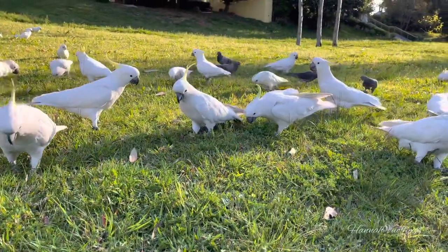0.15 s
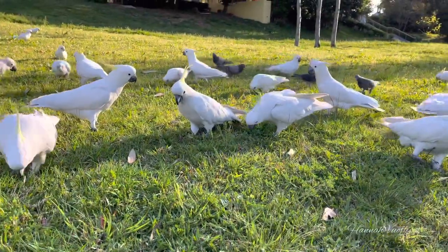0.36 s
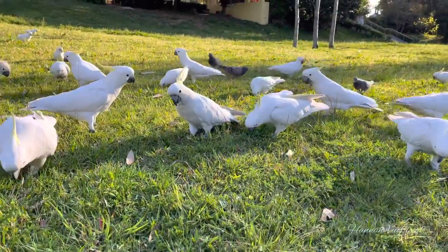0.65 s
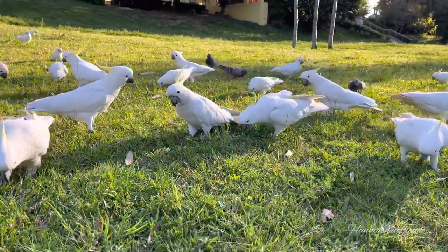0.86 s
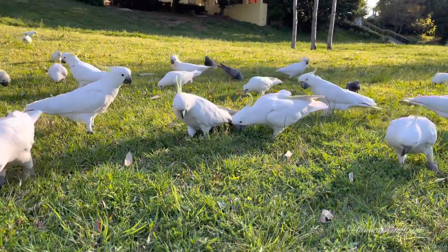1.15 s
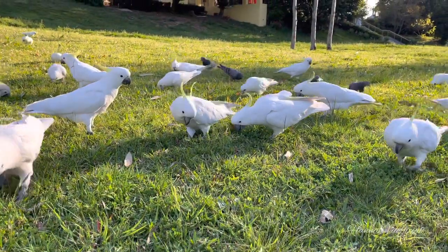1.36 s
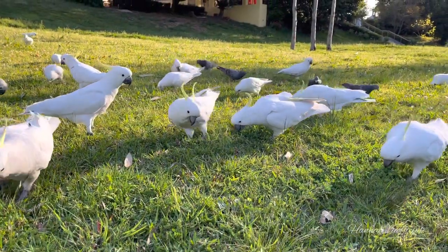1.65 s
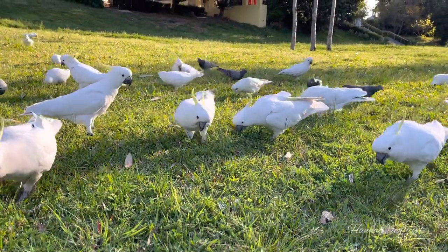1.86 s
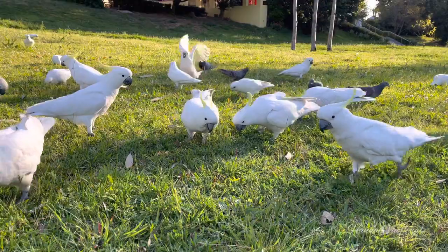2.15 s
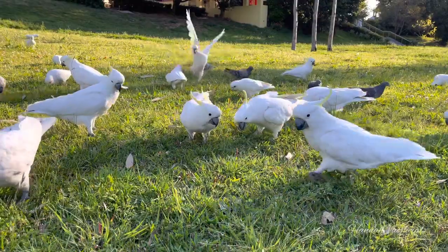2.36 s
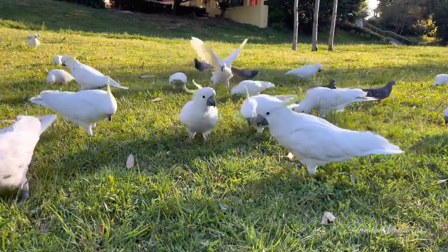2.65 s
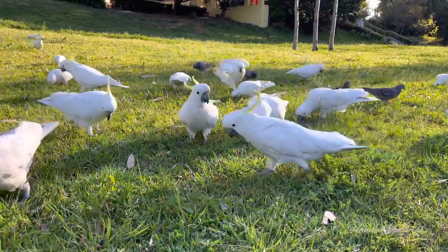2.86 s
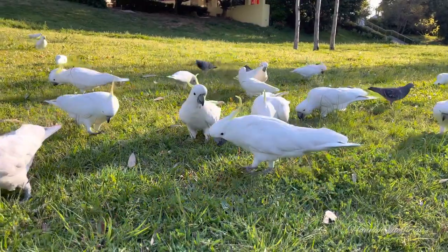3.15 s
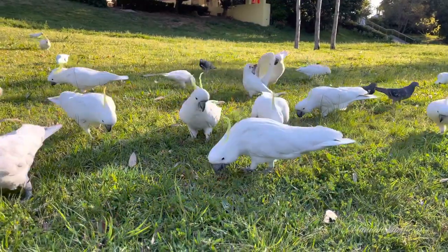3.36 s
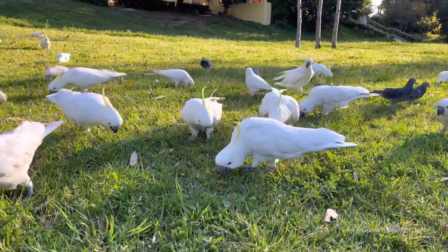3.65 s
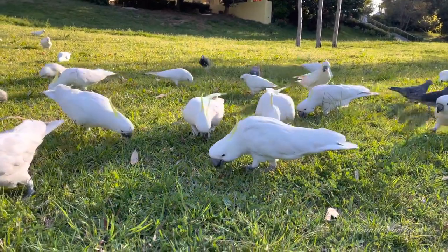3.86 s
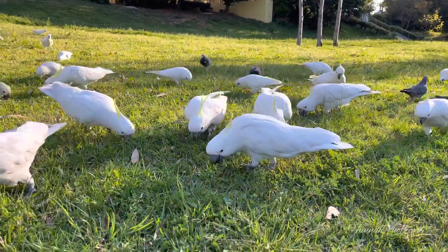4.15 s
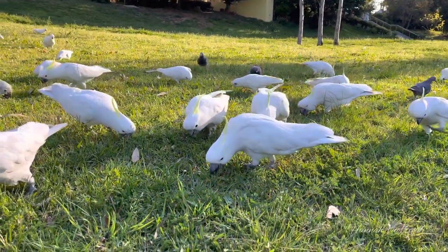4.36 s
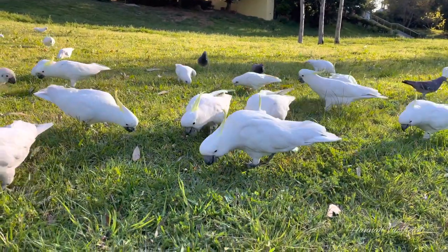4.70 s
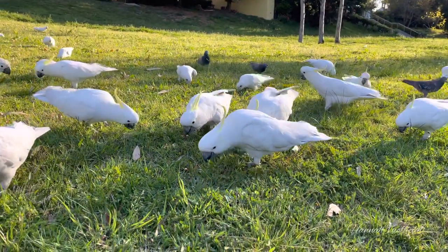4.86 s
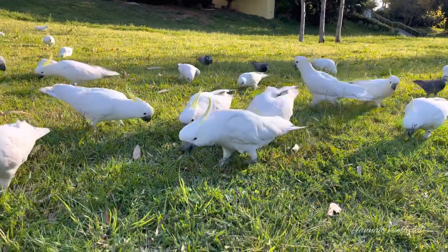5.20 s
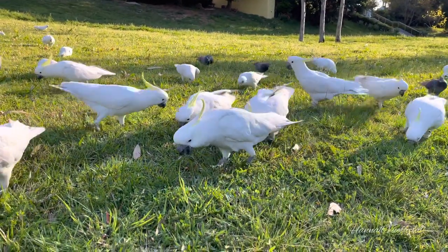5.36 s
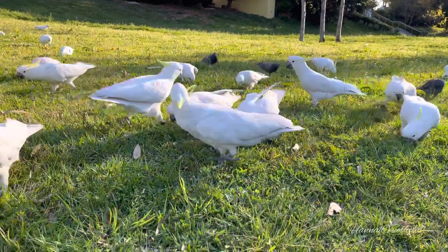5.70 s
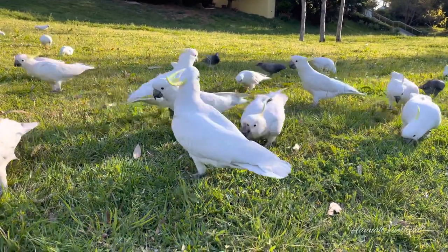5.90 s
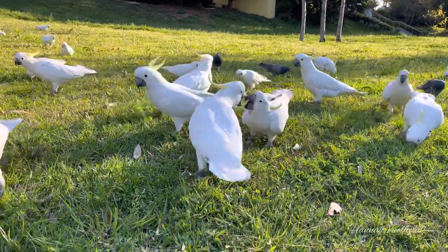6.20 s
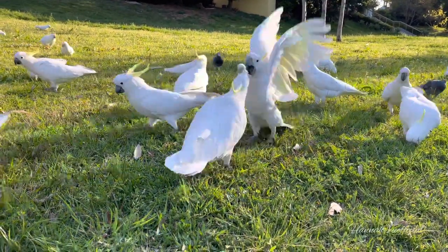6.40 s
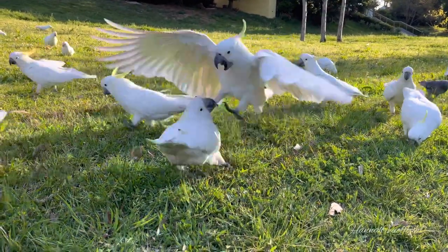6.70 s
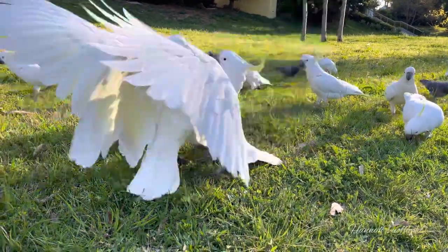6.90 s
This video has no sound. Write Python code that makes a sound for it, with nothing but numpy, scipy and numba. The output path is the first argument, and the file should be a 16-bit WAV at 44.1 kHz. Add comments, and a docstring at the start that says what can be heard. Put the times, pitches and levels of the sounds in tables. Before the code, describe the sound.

An open lawn with feeding cockatoos, heard close in stereo. The first second is nearly silent: faint quavering chatter, a small chirp, soft dull bumps and a light crack at 0.5. From about 1.1 low wind and a faint hum rise; a sharp, brittle seed crack snaps at 1.85. Faint slurred whistles sound far off at 2.3-2.7. At 3.2 a loud, harsh, raspy screech lasts about 0.2 seconds, growing duller. From 3.6 short falling chirps thicken, sliding quickly from high to lower pitch, with beak snaps, nibbles and dry rattles before some after 5.0. A brief, low gravelly squawk comes at 5.65, then clearer far whistles from 5.8. Thin two-note peeps repeat from 6.0. A bright crack clicks at 6.5 while feather and grass rustle swells from 6.4; a very short shrill squawk bursts at 6.85 as wind strengthens. Faint echo returns from trees.

```python
"""Cockatoos feed on a lawn. Faint chatter, chirps and seed cracks open; wind and hum rise after 1 s, far
whistles from 2.3 s. Close screeches at 3.2, 5.7 and 6.8 s: syrinx pulses and air ring a moving throat.
Falling chirps, some after rattles, thicken between; two-note peeps from 6 s; rustling swells from 6.4 s
as two birds squabble. Chirps and whistles are swept sines; cracks, wind and rustle are shaped noise.
Thumps are decaying sines; decaying noise makes the lawn reflections and the faint echo of the trees."""
import sys
import numpy as np
from scipy import signal
from scipy.fft import rfft, irfft
from scipy.io import wavfile
from scipy.ndimage import uniform_filter1d
from numba import njit

SR = 44100
rng = np.random.default_rng(int(sys.argv[2]) if len(sys.argv) > 2 else 0)


def materialize(psi):
    """Save the field psi as 16-bit PCM at rate SR to the path in sys.argv[1].

    A 1-D psi becomes a single channel; in a 2-D psi each row is a channel.
    """
    bounded = np.clip(np.atleast_2d(psi).T, -1, 1)
    quanta = np.round(bounded * 32767).astype(np.int16)
    wavfile.write(sys.argv[1], SR, quanta)


N = 310464
T = np.arange(N) / SR

# Screech effort: time_s, syrinx_pulse_hz, level_db
SCREECH_1 = [(3.204, 349.8, -43.5), (3.216, 349.7, -23.5), (3.234, 326.8, -18), (3.243, 137.2, -9),
             (3.288, 140.1, -13), (3.34, 162, -7), (3.397, 174.5, -15.5), (3.416, 162, -38)]
SCREECH_2 = [(5.65, 100.6, -39.5), (5.664, 96, -18.5), (5.695, 139.3, -11), (5.736, 151.8, -24),
             (5.763, 288, -31), (5.777, 272, -40)]
SCREECH_3 = [(6.834, 398.5, -38.5), (6.848, 379.3, -17), (6.869, 310.6, -14.5), (6.896, 339, -29.5)]
# Throat and beak resonances, before the beak moves: centre_hz, width_hz, relative_db
THROAT_1 = [(390, 340, -24.5), (770, 150, -21.5), (2133, 480, -1.5), (2900, 480, -9), (3720, 680, -9),
            (5360, 1100, -17), (6300, 850, -21.5), (8100, 940, -20), (11290, 1100, -25.5)]
THROAT_2 = [(348, 183, -5), (820, 260, -2.5), (1560, 760, 2), (1950, 310, 2.5), (3110, 420, -3),
            (4500, 590, -11.5), (6000, 1040, -18.5), (8000, 3400, -20)]
THROAT_3 = [(445, 410, -10), (1330, 420, 0), (1690, 840, -1), (2830, 560, -2.5), (4480, 1100, -8.5),
            (5370, 520, -9.5), (8900, 2200, -17)]
# Beaks crack seed and snap grass: start_s, snap_peak_db, knock_re_snap_db, upper_edge_hz
SEED_CRACKS = [(.502, -38.5, -5, 9000), (1.408, -40.5, -23, 6950), (1.8535, -11.5, -13.5, 9250),
               (3.696, -32, -24.5, 11990), (4.522, -38.5, 2.5, 8000), (4.66, -43, 4.5, 9030),
               (4.727, -33, -30, 13000), (4.772, -25, -36, 13000), (4.989, -38, -30, 12000),
               (5.276, -24, -30, 12770), (5.568, -38, -21, 12000), (6.177, -33.5, -7, 11900),
               (6.507, -20.5, -25, 13000)]
# Husk resonances: centre_hz, width_hz, relative_db
HUSK_MODES = [(2930, 1550, -19), (4710, 1100, -14), (5850, 1300, -9), (7260, 850, -7.5), (8480, 1800, -9),
              (11500, 1060, -2.5)]
# Falling chirps: start_s, length_s, top_hz, end_hz, level_db (before swell and sag), overtone_db
FALLING_CHIRPS = [(0.35, 0.056, 4420, 2280, -45.5, -20), (1.34, 0.055, 3850, 2510, -45, -20),
                  (3.611, 0.039, 4100, 2240, -33, -14), (3.854, 0.032, 4450, 2610, -36, -20),
                  (4.077, 0.12, 3320, 2260, -51.5, -28), (4.28, 0.14, 4830, 2284, -39.5, -11.5),
                  (4.397, 0.085, 2870, 2095, -47.5, -23), (4.64, 0.1, 3360, 2080, -45, -24),
                  (4.775, 0.11, 4270, 2030, -34, -2), (4.948, 0.086, 3020, 2100, -45.5, -22.5),
                  (5.077, 0.138, 4375, 2194, -31.5, -11), (5.362, 0.13, 4390, 2114, -30, -14),
                  (5.683, 0.122, 3747, 2105, -34.5, -16)]
# Two-note peeps of one bird: start_s, level_db (before swell and sag)
TWO_NOTE_PEEPS = [(6.025, -41), (6.24, -43), (6.464, -40), (6.694, -39), (6.917, -36)]
# Quavering chatter: start_s, length_s, start_pitch_hz, end_pitch_hz, beak_hz, level_db (before fades)
CHATTER_NOTES = [(0.33, 0.073, 1390, 1300, 4000, -50.5), (0.68, 0.069, 1300, 1196, 2800, -59),
                 (0.978, .04, 2400, 2870, 5300, -65), (1.29, 0.13, 1400, 1310, 3800, -65),
                 (1.782, .19, 2130, 2680, 2200, -52), (3.546, 0.087, 1346, 1346, 4244, -46),
                 (3.809, 0.081, 2050, 1950, 2900, -56), (6.44, .06, 3170, 3070, 3100, -43)]
# Dry rattles ahead of chirps: start_s, length_s, level_db (before fades)
DRY_RATTLES = [(5.004, 0.067, -49), (5.283, 0.067, -44.5), (5.594, 0.071, -48.5)]
# Throat resonances of a rattle: centre_hz, width_hz, relative_db
RATTLE_MODES = [(2700, 460, 1), (3580, 490, -3), (4800, 1400, -12), (5950, 990, -18)]
# Port balance of the small birds, shaded by the microphone body: pitch_hz, left_minus_right_db
PORT_SHADE = [(1000, 2), (2150, -4), (2800, 2.5), (3700, 5.5), (6000, 9.5), (12000, 3)]
# Far slurred whistles: start_s, length_s, lowest_pitch_time_s, lowest_to_highest_s,
# low_hz, high_hz, level_db, left_lead_samples
FAR_WHISTLES = [(2.308, 0.095, 2.5, .12, 1547, 1683, -53.5, -9),
                (2.493, 0.19, 2.65, .12, 1493, 1658, -46.5, -9.5),
                (5.775, .19, 5.797, 0.098, 1264, 1842, -27.5, 10),
                (5.937, 0.26, 5.945, 0.12, 1378, 1780, -37, 10),
                (6.414, 0.1, 6.51, .14, 1207, 1478, -32.5, 6),
                (6.529, 0.17, 6.75, 0.1, 1233, 1785, -27.5, 10),
                (6.69, 0.18, 6.69, 0.11, 1337, 1715, -34.5, 10.5)]
# Soft low thumps: start_s, peak_db, pitch_hz
LOW_THUMPS = [(.345, -46.5, 285), (.415, -48, 254), (2.272, -32, 87), (3.945, -27.5, 100)]
# Steps and wingbeats: peak_s, rise_s, decay_s, level_db
MOVEMENTS = [(.07, .12, .08, -55.5), (2.08, 0.023, 0.14, -53.5), (2.43, 0.098, 0.55, -54),
             (2.8, 0.14, 0.25, -51), (4.45, 0.036, .2, -55), (4.76, .06, 0.36, -56.5),
             (5.4, 0.44, 1, -54.5), (6.44, .06, 0.5, -45), (6.82, 0.16, 3.8, -38)]
# Grass and feather spectrum: freq_hz, relative_db_per_hz
RUSTLE_SPECTRUM = [(110, -38), (250, -0.5), (1500, -9), (3000, -6.5), (5500, -10.5), (7300, -9),
                   (8700, -1.5), (10000, -8), (11300, 2.5), (12000, -9), (12900, -21)]
# Wind strength before a fixed trim: time_s, level_db
WIND_LEVEL = [(0, -104), (1.1, -73), (1.32, -53.5), (1.55, -44.5), (3.1, -42), (3.85, -39.5), (4.2, -41),
              (6.3, -41), (6.8, -35)]
# Wind spectrum: freq_hz, relative_db_per_hz
WIND_SPECTRUM = [(20, -27.5), (35, -18), (55, 0.5), (100, -5), (150, -10), (220, -15), (330, -24.5),
                 (500, -33.5), (1000, -55)]
# Low hum: time_s, level_db
HUM_LEVEL = [(1.05, -85), (1.5, -48.5), (2.6, -52.5), (2.85, -43), (4.0, -43), (5.4, -52.5)]
# Far wash spectrum: freq_hz, relative_db_per_hz
AIR_SPECTRUM = [(110, -30), (190, -5), (270, 1), (550, -10.5), (900, -5), (1500, -10.5), (2400, -13.5),
                (3500, -20), (8000, -17), (12000, -22.5)]

# Slide time constant: a fixed time plus a share of the call's length
CHIRP_FALL_S, CHIRP_FALL_SHARE = 0.00516, 0.065
CHIRP_SWELL_DB = 17  # low note over top note
PEEP_S, PEEP_FALL_S, PEEP_TOP_HZ, PEEP_END_HZ, PEEP_SWELL_DB = 0.096, 0.00497, 3658, 2024, 7.5
WHISTLE_ATTACK_S, WHISTLE_RELEASE_SHARE = 0.02, 0.44  # release as a share of the note
NIBBLE_FROM_S, NIBBLE_TO_S, NIBBLE_MIN_DB, NIBBLE_RANGE_DB = 4.4, 6.8, -46, 4
RUSTLE_REST_DB = -62.5  # the flock standing and feeding
HUM_HZ, AIR_DB, WIND_TRIM_DB = 117.8, -57.5, -1.53
ECHO_T60_S, ECHO_DAMP_HZ = 1.0, 3220
TOP_HZ = 12915


def undb(db):
    """Decibels to gain."""
    return 10 ** (np.asarray(db) / 20)


def unit(x):
    """Scale to rms 1."""
    return x / np.sqrt(np.mean(x ** 2) + 1e-18)


def curves(rows, t):
    """Table columns interpolated at times t."""
    time_s, *columns = np.transpose(rows)
    return [np.interp(t, time_s, column) for column in columns]


def span(rows):
    """Sample times from a table's first row to its last."""
    return T[int(rows[0][0] * SR):int(rows[-1][0] * SR)]


def times(length_s):
    """Sample times of a note, from 0."""
    return np.arange(int(length_s * SR)) / SR


def swell(t, attack_s, release_s):
    """Soft attack, hold and soft release over times t."""
    ramp = np.minimum((t - t[0]) / attack_s, (t[-1] - t) / release_s)
    return np.sin(np.pi / 2 * np.clip(ramp, 0, 1)) ** 2


def fade(t, edge_s):
    """Equal soft start and end over times t."""
    return swell(t, edge_s, edge_s)


def noise(t):
    """White noise for times t."""
    return rng.standard_normal(N)[:len(t)]


def walk(t, rate_hz):
    """Random wander of spread near 1: straight lines between rate_hz random points a second."""
    return 1.2 * np.interp((t - t[0]) * rate_hz, np.arange(4096), rng.standard_normal(4096))


def colour(x, points):
    """Filter x by (freq_hz, db) points, then scale to rms 1."""
    hz, db = np.transpose(points)
    log_f = np.log(np.arange(N // 2 + 1) * SR / N + 1)
    return unit(irfft(rfft(x) * undb(np.interp(log_f, np.log(hz), db)), N))


@njit
def band(x, hz, width_hz):
    """State-variable band-pass with a moving centre."""
    y, band_state, low_state = np.empty(len(x)), 0., 0.
    for i in range(len(x)):
        g, k = np.tan(np.pi * hz[i] / SR), width_hz / hz[i]
        v = (band_state + g * (x[i] - low_state)) / (1 + g * (g + k))
        band_state, low_state = 2 * v - band_state, low_state + 2 * g * v
        y[i] = k * v
    return y


def resonate(x, modes, tuning=1):
    """Sum of steep (centre_hz, width_hz, db) resonances, each two band-passes, retuned together."""
    out = 0
    for hz, width_hz, db in modes:
        centre_hz = np.minimum(hz * tuning * np.ones(len(x)), SR / 2.2)
        once = band(x, centre_hz, float(width_hz))
        out = out + undb(db) * band(once, centre_hz, float(width_hz))
    return out


def add(out, x, start_s, pan_db=0, lag=0):
    """Mix x in; it reaches the left port lag samples before the right; positive pan_db is left."""
    for channel, side in enumerate((1, -1)):
        i = max(int(start_s * SR) + channel * lag, 0)
        part = x[:max(N - i, 0)]
        out[channel, i:i + len(part)] += part * undb(side * pan_db / 2)


def spread(make, side_db):
    """Two draws of a sound as middle and side."""
    return make() + undb(side_db) * make() * np.array([[1], [-1]])


def syrinx(t, hz, rasp, jitter, scatter_db, open_share):
    """Membranes slap shut at uneven intervals; air rushes through after each slap. Returns both."""
    turns = np.cumsum(hz * (1 + jitter * walk(t, 200))) / SR
    slaps = np.diff(np.floor(turns), prepend=0) * np.sqrt(SR / hz) * undb(scatter_db * walk(t, 300))
    air = unit(noise(t) * (0.6 + np.exp(-(turns % 1) / open_share)))
    rasp = np.clip(rasp, 0, 1)
    return np.sqrt(1 - rasp) * slaps, np.sqrt(rasp) * air


def screech(rows, throat, jitter, scatter_db, rasp_hz, rasp_db, rasp_share,
            gape_per_db, sink_per_s, dull_db_per_s, body_db):
    """The syrinx rings a throat that effort tunes higher; the call grows raspier and duller."""
    t = span(rows)
    hz, db = curves(rows, t)
    effort_db, late_s = db - db.max(), t - t.mean()
    rasp = np.clip(rasp_share + 1.8 * late_s - 0.008 * effort_db, 0.05, 1)  # weak push: mostly air
    tuning = 1 + gape_per_db * effort_db - sink_per_s * (t - t[np.argmax(db)])
    slaps, air = syrinx(t, hz, rasp, jitter * rasp, scatter_db, open_share=0.48)
    shrill = resonate(air, [(rasp_hz, 500, rasp_db)])
    voice = resonate(slaps + air + shrill, throat, tuning * (1 + 0.017 * walk(t, 150)))

    low = signal.sosfiltfilt(signal.butter(3, 3200, fs=SR, output="sos"), voice)
    voice = low + (voice - low) * undb(-dull_db_per_s * late_s)
    # levelled, so that effort alone sets the loudness
    steady = voice / np.sqrt(uniform_filter1d(voice ** 2, size=SR // 45) + 1e-9)
    # the low body changes little with effort
    body = unit(resonate(slaps + air, [(560, 930, 0)], tuning)) * undb(body_db + 0.22 * effort_db)
    return (steady * undb(db) + body) * fade(t, 0.005)


def screeches():
    """Three close calls: the first grows duller as its beak closes, tuning near still; the others sink."""
    out = np.zeros((2, N))
    first = screech(SCREECH_1, THROAT_1, jitter=0.13, scatter_db=0.3, rasp_hz=2665, rasp_db=5.5,
                    rasp_share=0.33, gape_per_db=0.001, sink_per_s=-0.1, dull_db_per_s=40, body_db=-42)
    second = screech(SCREECH_2, THROAT_2, jitter=0.35, scatter_db=2.0, rasp_hz=1500, rasp_db=-14,
                     rasp_share=0.37, gape_per_db=0.01, sink_per_s=1.7, dull_db_per_s=20, body_db=-49)
    third = screech(SCREECH_3, THROAT_3, jitter=0.2, scatter_db=3.0, rasp_hz=2900, rasp_db=3.5,
                    rasp_share=0.55, gape_per_db=0.02, sink_per_s=1.5, dull_db_per_s=62, body_db=-42)
    add(out, first, SCREECH_1[0][0], pan_db=-1.8)
    add(out, second, SCREECH_2[0][0], pan_db=1.0, lag=2)
    add(out, third, SCREECH_3[0][0], pan_db=1.5, lag=2)
    return out


def crack(db, knock_db, edge_hz, burst_s=0.0012, tail_s=0.0062, knock_hz=750):
    """A brittle noise burst rings the husk; the beak gives a low knock."""
    t = T[:SR // 30]
    burst = noise(t) * (np.exp(-t / burst_s) + 0.052 * np.exp(-t / tail_s))
    snap = resonate(burst, HUSK_MODES)
    snap = signal.sosfilt(signal.butter(10, min(edge_hz, SR / 2.2), fs=SR, output="sos"), snap)
    knock = np.sin(2 * np.pi * knock_hz * t) * np.exp(-t / 0.0016)
    return undb(db) * (snap / np.abs(snap).max() + undb(knock_db) * knock)


def cracks(nibble_count=5):
    """Single cracks and a few faint nibbles at random times, left of centre."""
    out = np.zeros((2, N))
    for start_s, db, knock_db, edge_hz in SEED_CRACKS:
        add(out, crack(db, knock_db, edge_hz), start_s, pan_db=4.5)
    for when, size in rng.random((nibble_count, 2)):
        nibble = crack(NIBBLE_MIN_DB + NIBBLE_RANGE_DB * size, knock_db=-26, edge_hz=13000)
        add(out, nibble, NIBBLE_FROM_S + when * (NIBBLE_TO_S - NIBBLE_FROM_S), pan_db=2.5)
    return out


def chirp(length_s, fall_s, top_hz, end_hz, db, swell_db, overtone_db):
    """A begging bird slides from a high note to a low one; overtones flare during the slide."""
    t = times(length_s)
    middle_s = 0.46 * length_s
    slide = 0.5 + 0.5 * np.tanh((t - middle_s) / fall_s / 2)
    scoop = 1 - 230 * np.maximum(middle_s - t - 0.04, 0) ** 2  # long calls first swoop up
    hz = (top_hz + (end_hz - top_hz) * slide) * scoop * (1 + 0.0052 * walk(t, 255))
    phase = 2 * np.pi * np.cumsum(hz) / SR

    flare = 4 * slide * (1 - slide)  # 1 at mid-slide
    overtones = flare ** 2 * np.sin(2 * phase) + undb(-14) * flare * np.sin(3 * phase)
    tone = np.sin(phase) + undb(overtone_db) * overtones
    level_db = db - swell_db * (1 - slide) + 1.5 * walk(t, 120)
    voiced = 1 / (1 + flare * (0.007 / fall_s) ** 4)  # the voice breaks in a very quick leap
    sag = 1.7 * (1 - 0.88 * np.exp((t - t[-1]) / 0.042))  # eases off towards the end
    return np.sqrt(2) * tone * undb(level_db) * voiced * sag * fade(t, 0.0083)


def chirps():
    """Sliding chirps, slower the longer they are, plus a late run of two-note peeps."""
    out = np.zeros((2, N))
    for start_s, length_s, top_hz, end_hz, db, overtone_db in FALLING_CHIRPS:
        fall_s = CHIRP_FALL_S + CHIRP_FALL_SHARE * length_s
        add(out, chirp(length_s, fall_s, top_hz, end_hz, db, CHIRP_SWELL_DB, overtone_db), start_s)
    for start_s, db in TWO_NOTE_PEEPS:
        peep = chirp(PEEP_S, PEEP_FALL_S, PEEP_TOP_HZ, PEEP_END_HZ, db, PEEP_SWELL_DB, overtone_db=-20)
        add(out, peep, start_s)
    return out


def chatter(quaver_hz=46, depth=0.05):
    """Short notes with a fast quaver; the beak favours harmonics near its resonance."""
    out = np.zeros((2, N))
    for start_s, length_s, from_hz, to_hz, beak_hz, db in CHATTER_NOTES:
        t = times(length_s)
        quaver = 1 + depth * np.sin(2 * np.pi * quaver_hz * t) + 0.031 * walk(t, 600)
        hz = np.linspace(from_hz, to_hz, len(t)) * quaver
        phase = 2 * np.pi * np.cumsum(hz) / SR
        tone = sum(np.sin(k * phase) / (1 + ((k * hz - beak_hz) / 900) ** 2) for k in range(1, 6))
        broken = undb(3.6 * walk(t, 212))  # the voice catches and rasps
        add(out, unit(tone * broken) * undb(db) * fade(t, length_s / 3), start_s)
    return out


def rattles(rate_hz=102):
    """The syrinx ticks slowly before a chirp."""
    out = np.zeros((2, N))
    for start_s, length_s, db in DRY_RATTLES:
        t = times(length_s)
        source = sum(syrinx(t, rate_hz, rasp=0.32, jitter=0.06, scatter_db=3.0, open_share=0.2))
        add(out, unit(resonate(source, RATTLE_MODES)) * undb(db) * fade(t, 0.015), start_s)
    return out


def shade(x, lead_s=0.00007):
    """Sound from the left reaches that port first; each pitch favours one port."""
    f_hz = np.arange(N // 2 + 1) * SR / N
    balance_db = np.interp(f_hz, *np.transpose(PORT_SHADE))
    tilt = undb(balance_db / 2) * np.exp(1j * np.pi * f_hz * lead_s)
    return irfft(rfft(x) * np.array([tilt, 1 / tilt]), N)


def whistles():
    """Far notes swing between two pitches; harmonic 2 dominates, the others emerge as pitch rises."""
    out = np.zeros((2, N))
    for start_s, length_s, lowest_s, rise_s, low_hz, high_hz, db, lead in FAR_WHISTLES:
        t = start_s + times(length_s)
        climb = np.sin(np.pi / 2 * (t - lowest_s) / rise_s) ** 2
        hz = low_hz + (high_hz - low_hz) * climb  # pitch of harmonic 2
        phase = np.pi * np.cumsum(hz * (1 + 0.007 * walk(t, 200))) / SR
        others = undb(-24) * np.sin(phase) + undb(-25) * np.sin(3 * phase) + undb(-30) * np.sin(5 * phase)
        tone = np.sin(2 * phase) + (hz / high_hz) ** 5 * others
        shape = swell(t, WHISTLE_ATTACK_S, WHISTLE_RELEASE_SHARE * length_s)
        level = undb(db + 0.71 * walk(t, 90))
        add(out, np.sqrt(2) * tone * level * shape, start_s, lag=int(round(lead)))
    return out


def thumps(swell_s=0.0084):
    """Dull low bumps: sines that swell and die within a few cycles."""
    out, t = np.zeros((2, N)), T[:SR // 8]
    for start_s, db, hz in LOW_THUMPS:
        phase = 2 * np.pi * np.cumsum(hz * (1 + 0.04 * walk(t, 140))) / SR
        shape = (t / swell_s * np.exp(1 - t / swell_s)) ** 2
        add(out, undb(db) * np.sin(phase) * shape, start_s)
    return out


def rustle(grain_db=3.5, flutter_db=3.5):
    """Blades and feathers brush in countless tiny clicks; each movement swells and dies away."""
    def grains():
        sizes = undb(grain_db * np.minimum(rng.exponential(size=N), 6))
        clicks = rng.standard_normal(N) * sizes * (rng.random(N) < 0.4)
        return colour(clicks, RUSTLE_SPECTRUM)

    power = undb(RUSTLE_REST_DB) ** 2
    for peak_s, rise_s, decay_s, db in MOVEMENTS:
        from_peak_s = T - peak_s
        shape = np.exp(-np.where(from_peak_s < 0, (from_peak_s / rise_s) ** 2, from_peak_s / decay_s))
        power = power + (undb(db) * shape) ** 2
    return spread(grains, side_db=-3) * np.sqrt(power) * undb(flutter_db * walk(T, 25))


def scatter(x, t60_s, damp_hz, build_s):
    """Dense reflections as low-passed noise, different at each port, that builds up and decays."""
    t = T[:SR]
    decay = undb(-60 * t / t60_s)
    tail = rng.standard_normal((2, SR)) * decay * (1 - np.exp(-(t / build_s) ** 2))
    tail /= np.sqrt(np.sum(tail ** 2, axis=1, keepdims=True))
    tail = signal.sosfilt(signal.butter(2, min(damp_hz, SR / 2.2), fs=SR, output="sos"), tail)
    return signal.fftconvolve(x, tail, axes=1)[:, :N]


def wind(buffet_db=2.0):
    """Low rumbling noise, nearly the same at both ports, buffeted at random."""
    level_db, = curves(WIND_LEVEL, T)
    rumble = spread(lambda: colour(noise(T), WIND_SPECTRUM), side_db=-13)
    return rumble * undb(level_db + WIND_TRIM_DB + buffet_db * walk(T, 13))


def hum():
    """A low sine wavering in pitch and level."""
    level_db, = curves(HUM_LEVEL, T)
    phase = 2 * np.pi * np.cumsum(HUM_HZ * (1 + 0.012 * walk(T, 11))) / SR
    return np.sqrt(2) * np.sin(phase) * undb(level_db + 1.7 * walk(T, 9))


def far_air():
    """The smooth far wash of the park: wide coloured noise."""
    wash = spread(lambda: colour(noise(T), AIR_SPECTRUM), side_db=-0.5)
    return wash * undb(AIR_DB + 0.75 * walk(T, 3.8))


def scene():
    """Near birds are almost dry; far ones carry more echo."""
    near = screeches() + cracks()
    small = shade(chirps() + chatter() + rattles())
    far = whistles()
    # lawn reflections, out of step at the two ports, widen the near birds
    treble = signal.sosfilt(signal.butter(2, 1100, "high", fs=SR, output="sos"), near)
    ground = scatter(treble, t60_s=0.014, damp_hz=9000, build_s=0.0007)[0] * np.array([[1], [-1]])
    trees = scatter(undb(-37.0) * near + undb(-14) * small, ECHO_T60_S, ECHO_DAMP_HZ, build_s=0.27)
    slope = scatter(far, t60_s=0.65, damp_hz=3000, build_s=0.015)
    birds = near + small + far
    echoes = undb(-8.5) * ground + trees + undb(-10.5) * slope
    return birds + echoes + thumps() + rustle() + wind() + hum() + far_air()


def record(dry, notch_hz=10150, notch_q=14.0):
    """A narrow treble band is notched out; loud peaks saturate softly; the top is cut."""
    x = signal.lfilter(*signal.iirnotch(notch_hz, notch_q, fs=SR), dry)
    x = x / (1 + x ** 6) ** (1 / 6)
    return signal.sosfilt(signal.ellip(8, 0.2, 70, TOP_HZ, fs=SR, output="sos"), x)


dry = scene()
out = record(dry)
materialize(out)
```